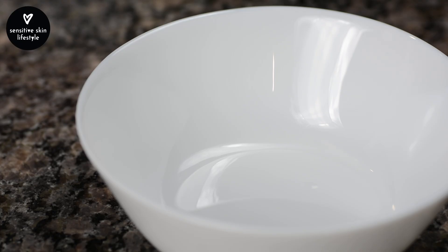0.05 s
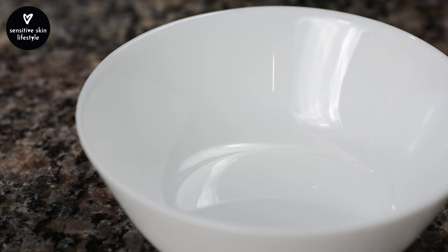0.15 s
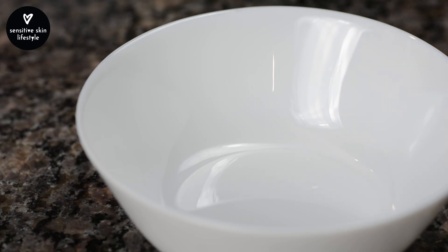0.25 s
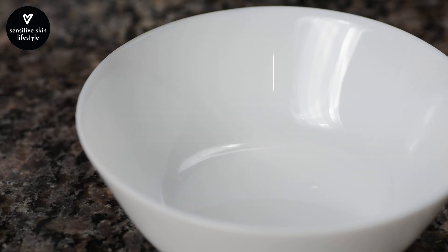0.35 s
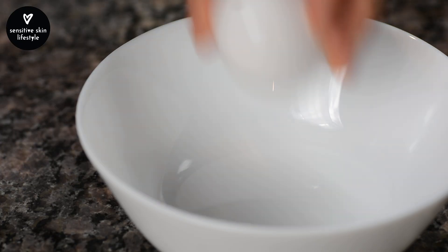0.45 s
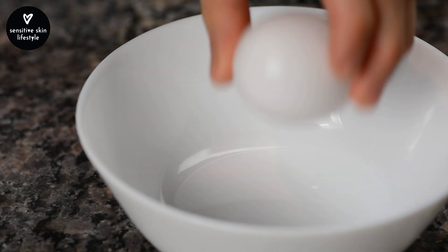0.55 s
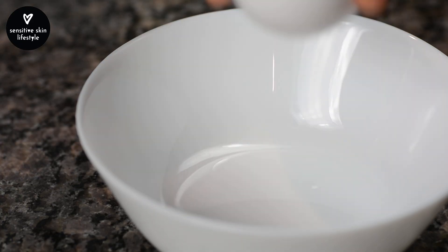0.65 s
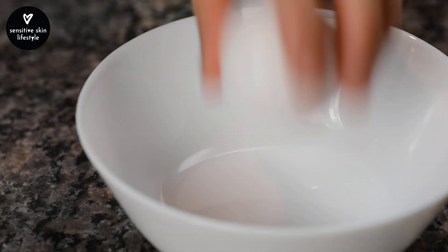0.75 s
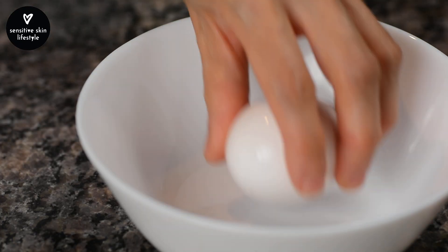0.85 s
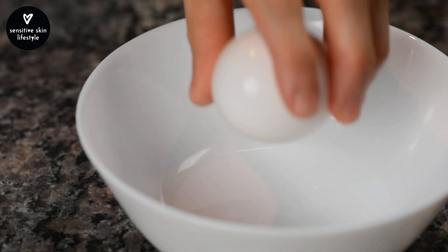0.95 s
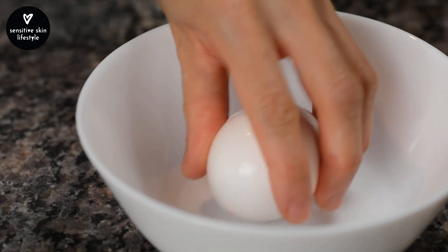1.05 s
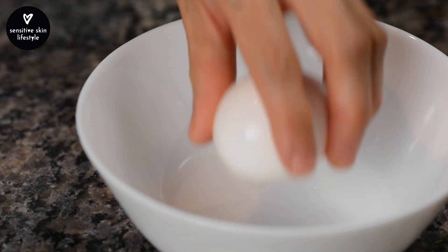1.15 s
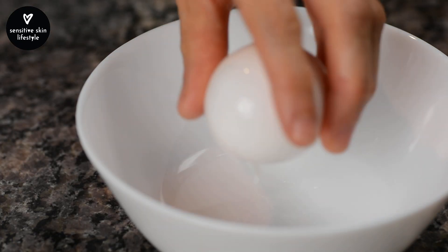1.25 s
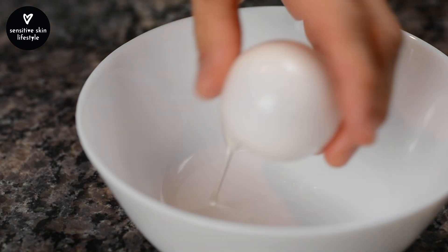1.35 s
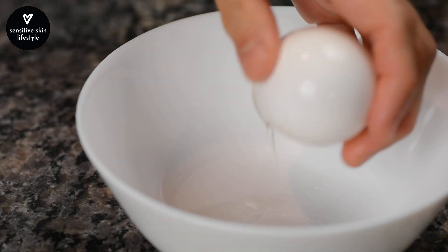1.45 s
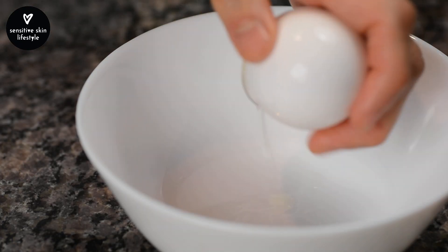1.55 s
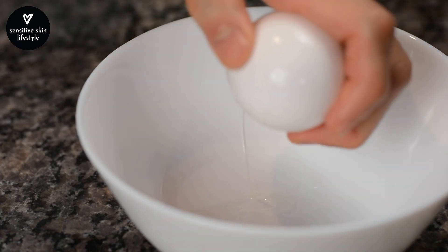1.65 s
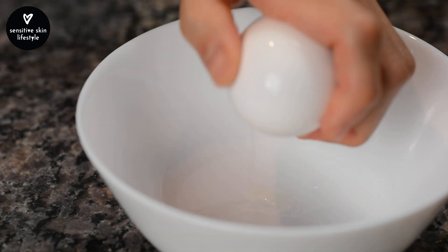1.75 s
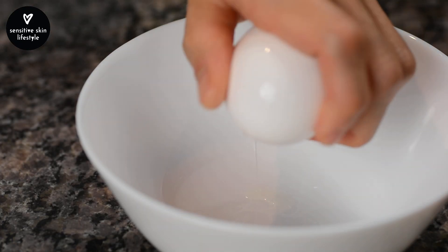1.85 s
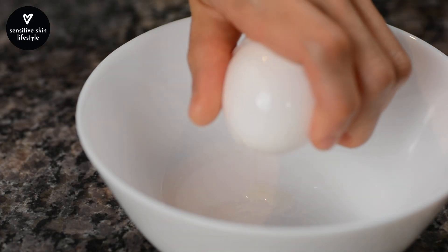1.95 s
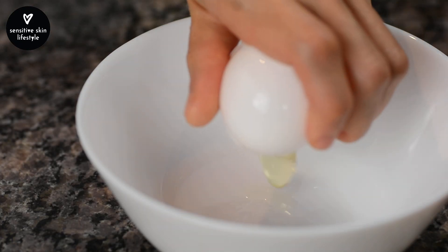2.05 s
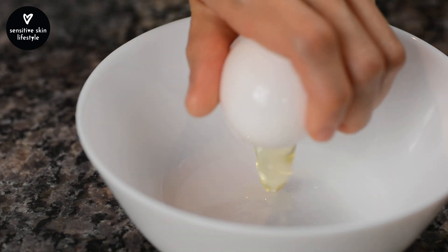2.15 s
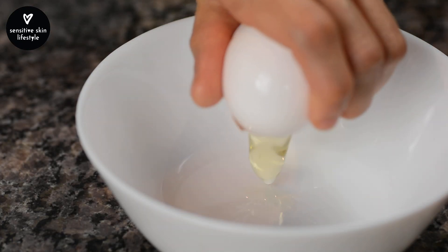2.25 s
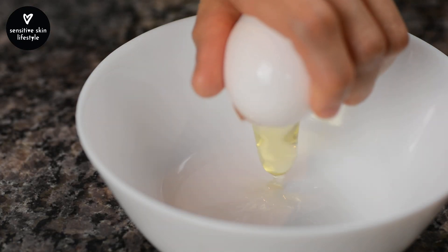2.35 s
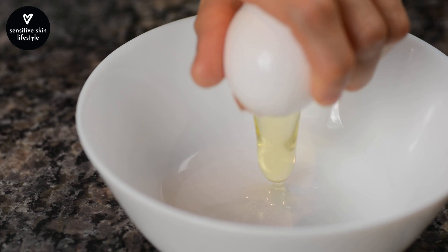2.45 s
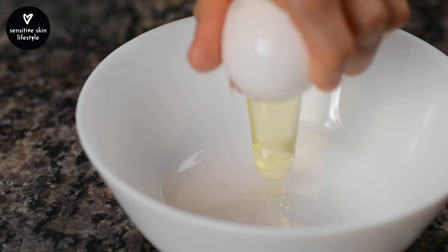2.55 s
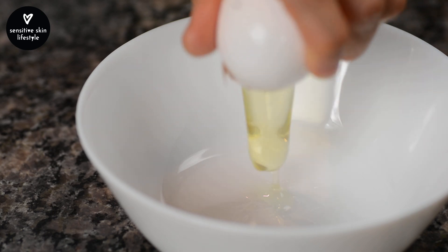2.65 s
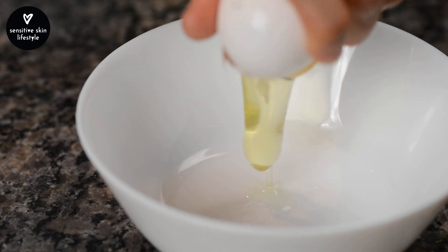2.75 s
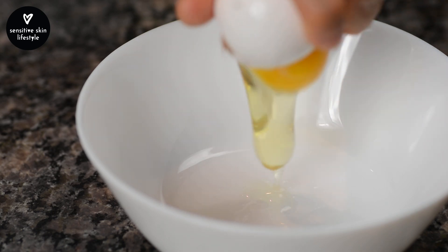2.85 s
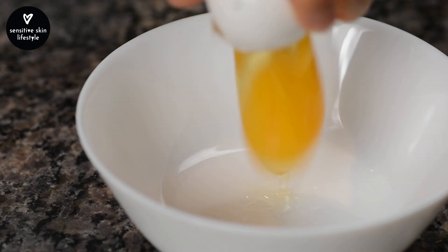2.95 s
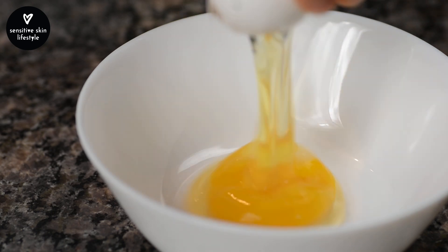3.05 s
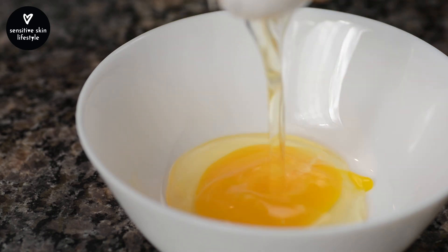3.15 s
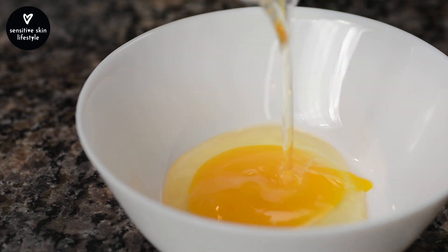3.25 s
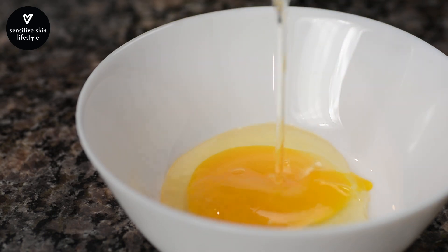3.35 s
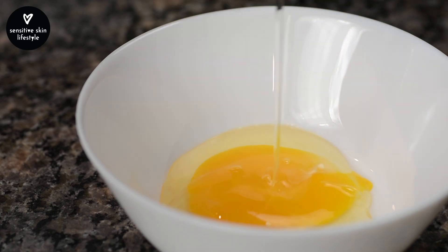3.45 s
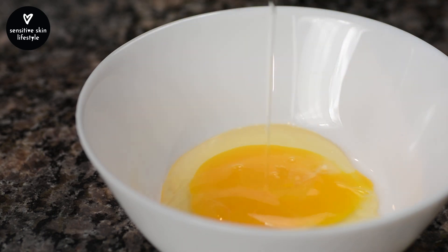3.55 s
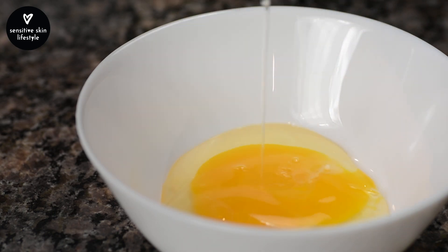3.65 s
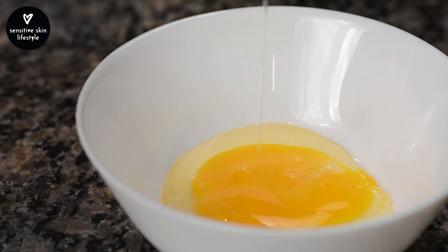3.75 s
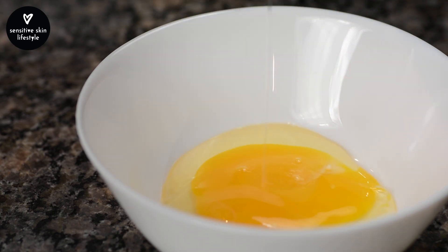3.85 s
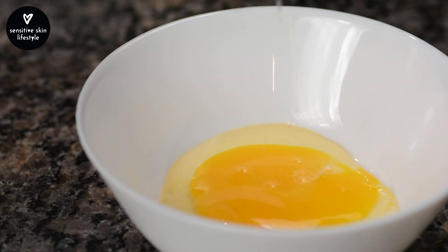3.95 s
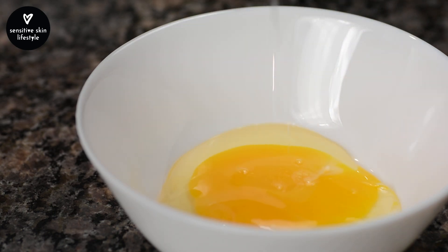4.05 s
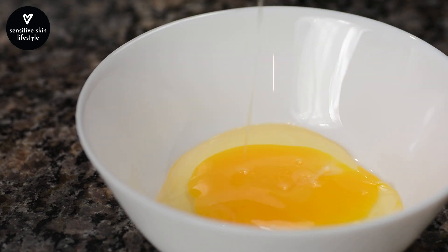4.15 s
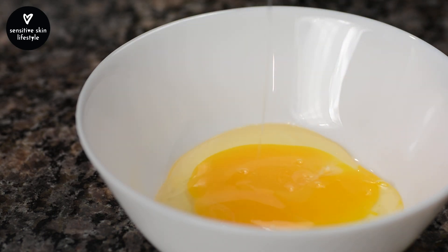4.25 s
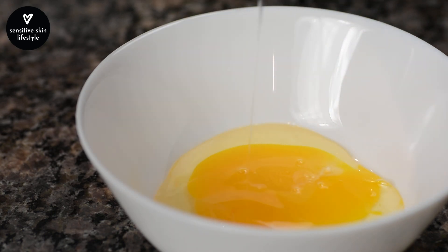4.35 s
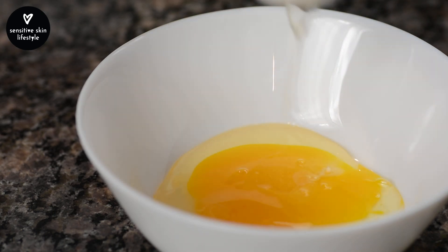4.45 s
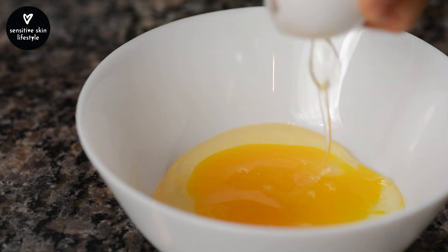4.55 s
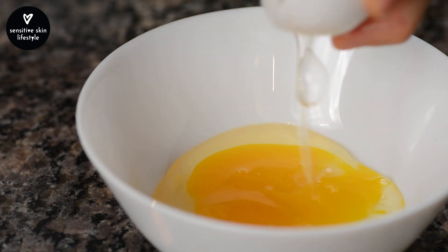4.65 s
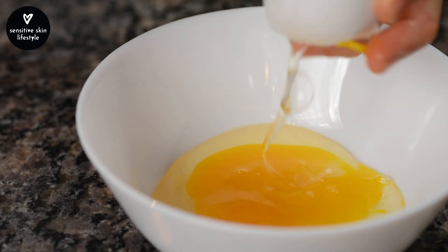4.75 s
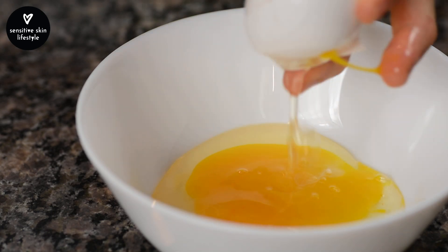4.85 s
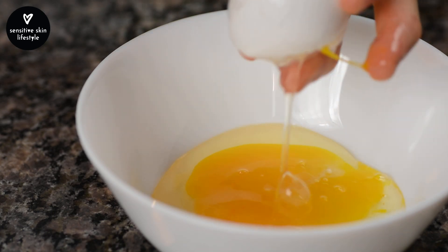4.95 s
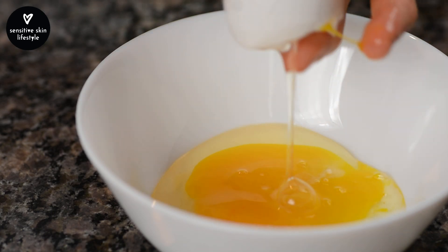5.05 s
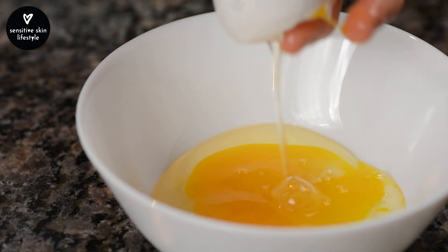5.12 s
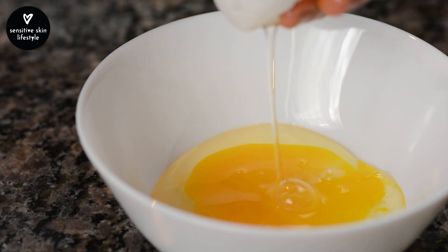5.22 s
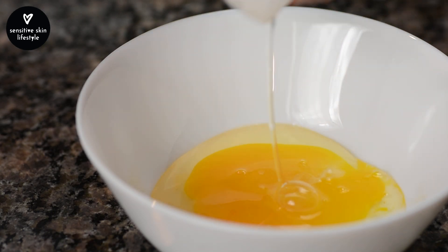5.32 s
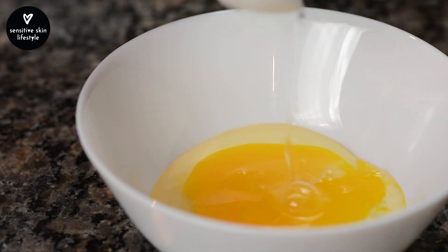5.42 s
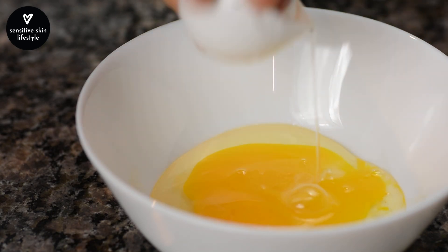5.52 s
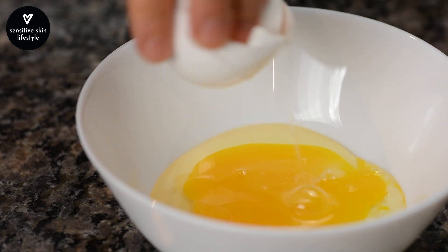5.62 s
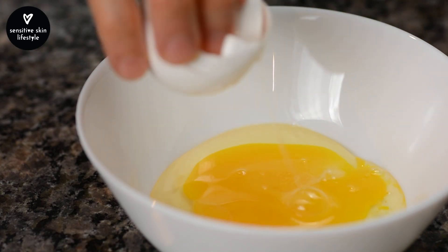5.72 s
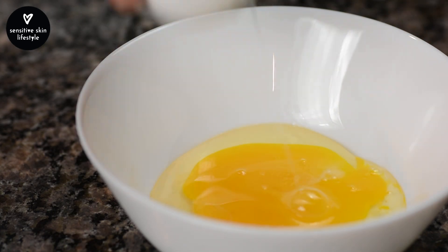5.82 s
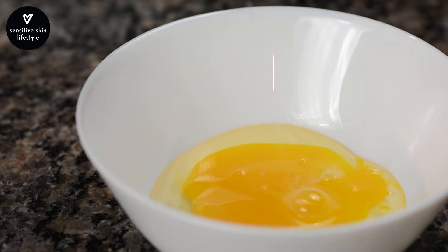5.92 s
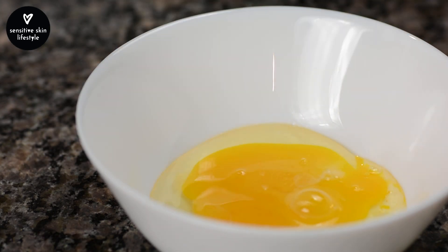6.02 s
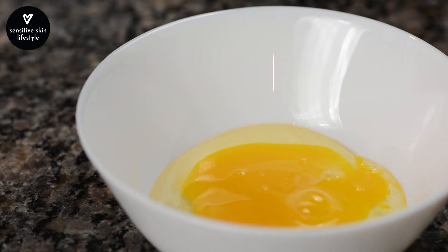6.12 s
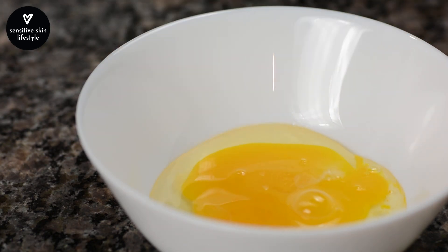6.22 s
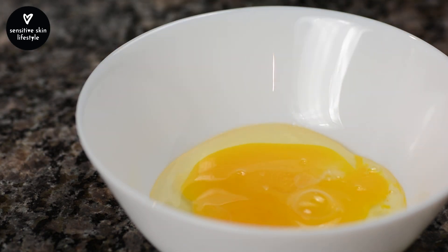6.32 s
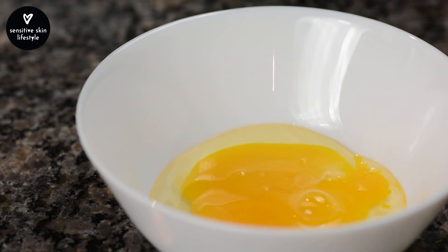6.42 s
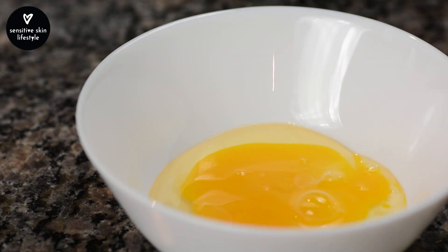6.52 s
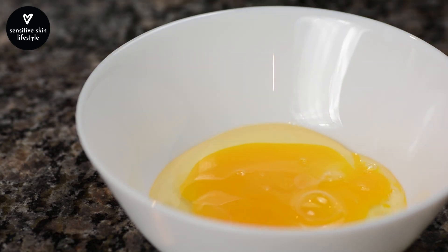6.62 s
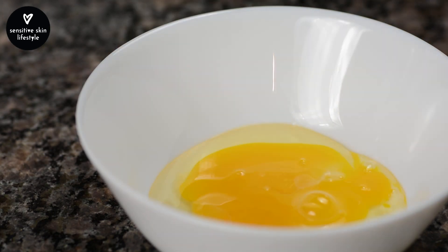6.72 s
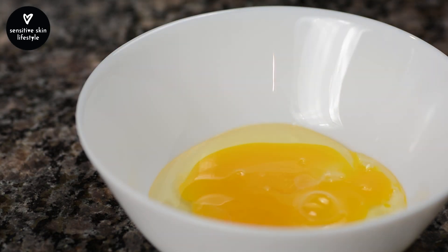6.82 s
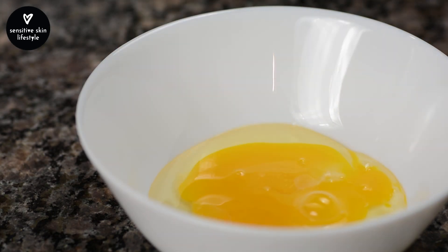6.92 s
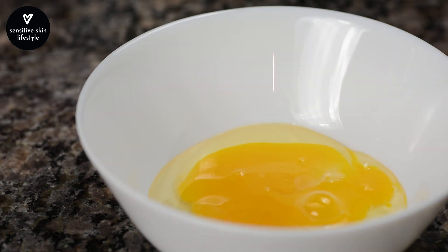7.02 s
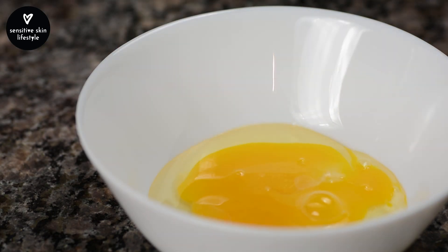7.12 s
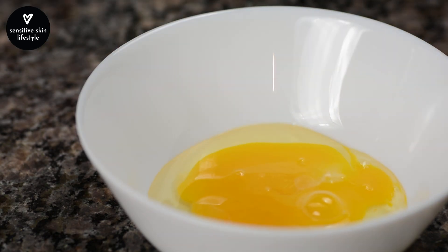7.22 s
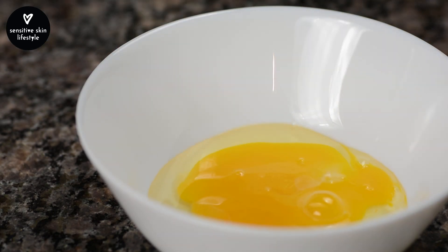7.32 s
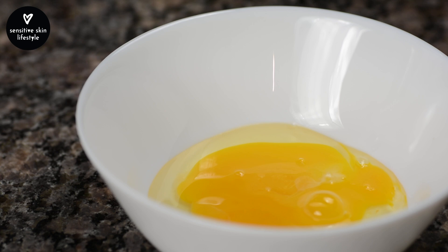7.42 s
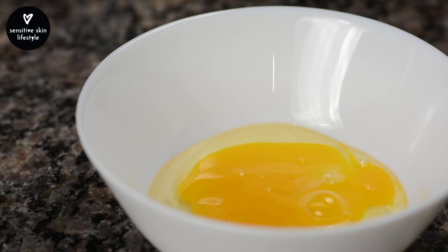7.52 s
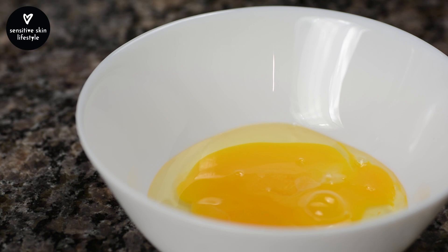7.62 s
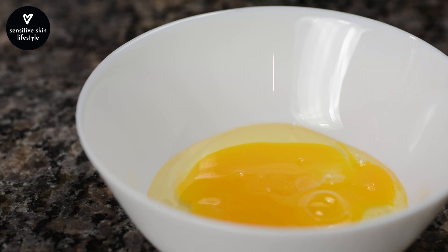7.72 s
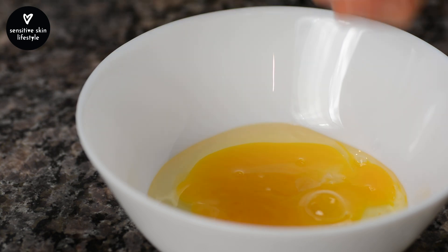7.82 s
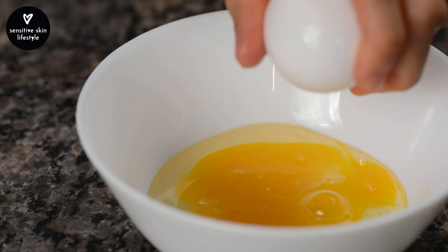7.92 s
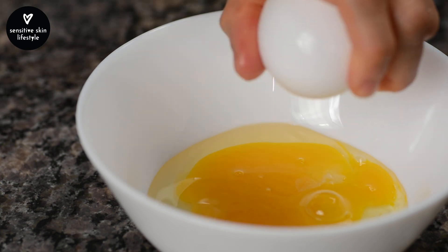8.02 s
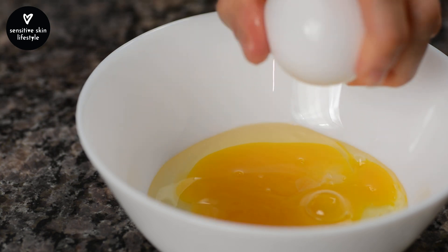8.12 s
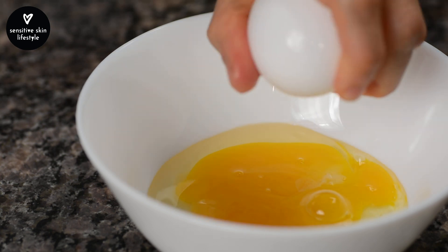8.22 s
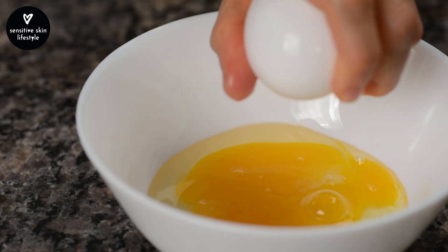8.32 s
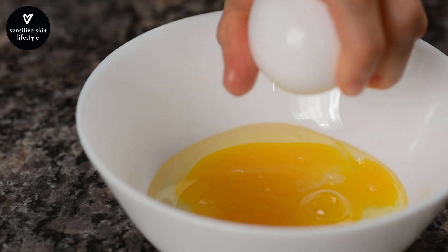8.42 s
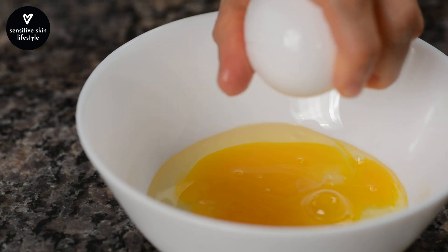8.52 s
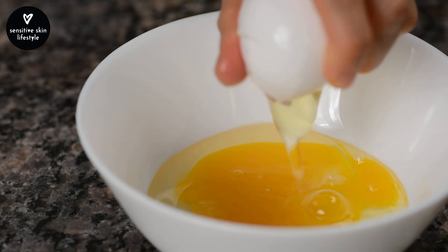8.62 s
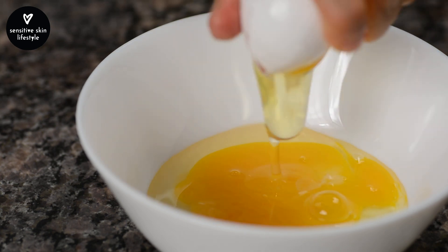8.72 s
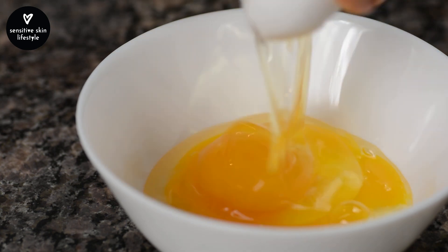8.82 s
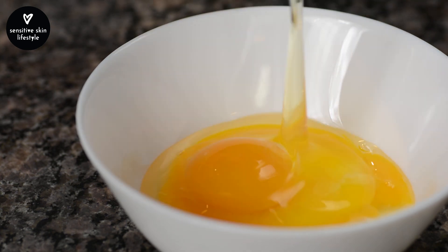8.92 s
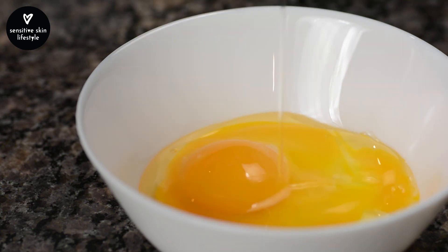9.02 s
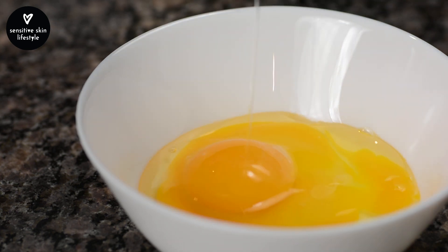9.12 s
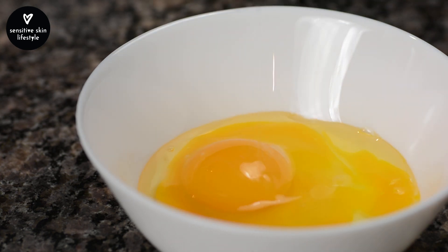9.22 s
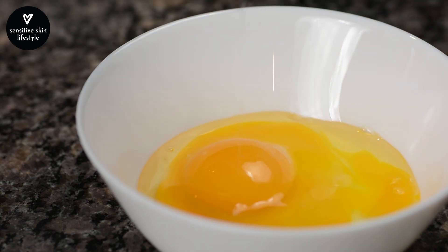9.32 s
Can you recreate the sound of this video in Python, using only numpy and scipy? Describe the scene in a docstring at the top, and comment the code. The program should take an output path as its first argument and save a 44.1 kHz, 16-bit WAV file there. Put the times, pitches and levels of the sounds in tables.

```python
"""An appliance murmurs throughout. First an egg is knocked twice on the rim of a ceramic bowl, close by.
Its shell snaps and crumbles, then the wet halves squelch. A second egg gets three knocks and is pulled open.
Clicks and splinters are random impulses shaped by filters; the bowl is a set of fading cosines.
A hard little kitchen answers each click with filtered random echoes; air and drone are filtered noise.
"""
import sys
import numpy as np
from scipy import signal
from scipy.fft import rfft, irfft
from scipy.io import wavfile
from scipy.ndimage import uniform_filter1d

SR = 44100
rng = np.random.default_rng(int(sys.argv[2]) if len(sys.argv) > 2 else 0)


def wav_out(sig):
    """Save sig, one row per channel (or a flat mono array), as 16-bit PCM at SR to the path in sys.argv[1]."""
    wavfile.write(sys.argv[1], SR, np.round(np.clip(np.atleast_2d(sig).T, -1, 1) * 32767).astype(np.int16))


N = 413216

# Egg on the rim, with relative levels: start_s, counter thump_db, dull body_db, shell clack_db, clack_hz,
# crack_db, low_ring_db, high_ring_db (the two rings belong to the bowl)
EGG_KNOCKS = [(0.8359, 7.5, 9, 24, 1400, 7, -12.5, -3), (1.056, -24, 5, 16.5, 3270, 9, -13.5, -13),
              (6.5677, -33, 18, 28, 1860, -0.5, -15.5, -45), (6.7997, -28, 11.5, 25, 2620, 12, -14, -40),
              (7.025, -16, 3.5, 12, 1660, -2.5, -48, -43)]
# Ringing tones of the bowl: pitch_hz, level_db (relative), t60_s (time to fall by 60 dB)
LOW_BOWL_TONES = [(650, -14, 0.049), (825, -19, .04), (1028, -15, 0.036), (1218, 3.5, 0.027),
                  (1386, -5, 0.058), (1595, -4, 0.045)]
HIGH_BOWL_TONES = [(3890, -7.5, 0.025), (4022, -1, 0.024), (4060, 0.5, 0.029), (4254, -6, 0.0199),
                   (5300, -10, 0.007), (5760, -5.5, 0.0087), (7160, -18.5, 0.02), (14000, -20, 0.015)]
# The clearest breaks of the shell: start_s, level_db (relative), piece_hz (its resonance),
# treble_db (relative to the resonance)
SHELL_SNAPS = [(1.9111, -14, 8000, 0.5), (1.975, 1, 1120, -4), (1.9889, -6, 8100, 10),
               (1.992, -8.5, 1710, 7.5), (2.2125, -8, 1900, -1), (2.415, -5, 2700, 2.5),
               (2.4414, 11, 3050, -8), (2.4996, 2, 2950, 3.5), (2.5524, -13.5, 7800, 17),
               (2.5638, 4, 1900, -1.5), (2.6322, 4, 2000, 0.5), (2.6552, -0.5, 2880, -6),
               (2.7482, -12, 2800, 6.5), (2.9205, -7, 6840, -14), (6.3134, -8.5, 2216, -9.5),
               (7.463, -16.5, 1700, 1), (7.7003, -5.5, 4060, 1), (7.7176, -3.5, 3970, -8.5),
               (7.8768, -4, 2310, -1.5), (7.9834, -7.5, 2000, 0.5), (8.1119, -6, 2000, -4.5),
               (8.1255, -12.5, 2300, 2.5), (8.1822, -7.5, 6570, -4), (8.202, -3, 1940, 3),
               (8.2158, -6.5, 8000, 12), (8.23, -3.5, 2400, 6.5), (8.2371, 0, 1960, -17),
               (8.2763, 0, 2130, -3), (8.389, -6, 2140, 6), (8.605, 2.5, 3300, 2), (8.6976, 1.5, 5300, -6),
               (8.7414, -1.5, 2840, -4), (8.7985, -5.5, 8000, 2.5), (8.814, -11, 2400, 5),
               (8.98, -5, 1380, 1.5), (9.1541, -0.5, 2570, -10)]
# Wet shell halves squeezed and shaken: start_s, level_db (relative), pocket_hz (air pocket resonance)
WET_SQUELCHES = [(4.516, -5, 2100), (4.586, 3, 1480), (4.608, -4, 3200), (4.6469, -8.5, 2530),
                 (4.871, 1.5, 1460), (4.872, -21, 4500), (4.946, -0.5, 1300), (4.9674, -2.5, 1650),
                 (4.976, -12, 8200), (5.286, -14.5, 2240), (5.3324, -7.5, 4300), (5.3515, -5, 1660),
                 (5.5202, -10, 1620), (8.7834, -11, 6500)]
# Fingers work the shell and flakes tear loose: start_s, end_s, level_db (of the smallest flakes, relative),
# wetness (0 to 1)
SHELL_CRUMBLES = [(1.891, 2.114, -34.5, 0.17), (2.184, 2.302, -37, 0), (2.603, 2.755, -30.5, 0),
                  (4.14, 4.314, -42, .55), (4.483, 4.692, -28.5, 0.52), (4.637, 4.796, -29.5, 0.86),
                  (5.352, 5.432, -28, 0.56), (7.703, 7.786, -31.5, 0.1), (7.872, 8.1, -42, 0.1),
                  (8.195, 8.293, -20, 0), (8.612, 8.864, -28.5, 0.23), (8.817, 9.012, -35, 0.13)]
# Early echoes off the bowl and the counter, before their spectrum is evened out: delay_s, level_db
EARLY_ECHOES = [(.0007, -3.5), (.0019, -7), (.0042, -14.5), (.0058, -8.5), (.007, -19), (0.0143, -21.5),
                (0.0183, -12)]
# How long the kitchen rings: pitch_hz, t60_s
KITCHEN_T60 = [(200, .5), (600, 0.52), (1400, 0.58), (4000, 0.61), (9000, 0.44), (15000, 0.46)]
# How strongly the kitchen rings, before its soft build-up: pitch_hz, level_db
KITCHEN_LEVEL = [(50, -24.5), (100, 1.5), (400, -5.5), (800, 4.5), (1500, -4), (4000, -5), (9000, -5),
                 (15000, -10)]
# Left-right difference of the egg's reflections, as a filter: pitch_hz, level_db
KITCHEN_WIDTH = [(60, -4.5), (200, -24.5), (1200, -29.5), (2400, -22.5), (4400, -11), (8000, -6.5),
                 (15000, -1.5)]
# Tone colour of the room air: pitch_hz, level_db (per Hz, relative)
AIR_COLOUR = [(25, -62), (55, -24), (80, -7.5), (105, -11), (135, -3.5), (175, -5.5), (300, -3), (410, 0.5),
              (500, -4.5), (700, -2), (1200, -5.5), (2000, -13.5), (6000, -25.5), (16000, -35.5)]
# Left-right difference of the air: pitch_hz, level_db (relative to the middle)
AIR_WIDTH = [(60, -34.5), (380, -22), (1290, -20.5), (2400, -11), (4400, -5.5), (15000, 1)]
# Tones of the appliance: pitch_hz, level_db (rms)
APPLIANCE_TONES = [(106, -66), (178, -66.5), (231, -64.5), (291, -64.5), (396, -60.5), (5749, -86)]

AIR_DB = -50.5  # rms level of the air in the middle
TOP_HZ = 16000  # upper limit of the final sound
# Smaller pieces carry less bass: lows relative to the resonance for a 1 kHz piece, and the change per octave
PIECE_LOW_DB, PIECE_LOW_DB_PER_OCTAVE = 8, -10.5
# Smaller pockets are brighter: treble relative to the resonance at 1 kHz, change per octave; then their lows
POCKET_TREBLE_DB, POCKET_TREBLE_DB_PER_OCTAVE, POCKET_LOW_DB = -18, 8.5, -15.5
# Flakes of dry and of soaked shell: resonance, and treble relative to it
DRY_FLAKE_HZ, DRY_FLAKE_TREBLE_DB = 3600, 1.5
WET_FLAKE_HZ, WET_FLAKE_TREBLE_DB = 1260, -18


def scene():
    """The eggs sit in the middle; their reflections and the air also differ between left and right."""
    eggs = knocks() + snaps() + squelches() + crumbles()
    air_mid, air_side = air()
    near = signal.oaconvolve(eggs, near_path())[:N]
    mid = near + room(eggs) + air_mid

    sideways = tail()
    add(sideways, 0, amp(-4.5) * burst(splinter_share=1.0, fade_s=0.008, per_s=4000))
    side = colour(signal.oaconvolve(eggs, sideways)[:N], KITCHEN_WIDTH) + air_side
    balance = amp([[-0.2], [0.2]])  # the right is slightly louder
    return np.array([mid + side, mid - side]) * balance


def knocks():
    """The egg thuds on the rim, its shell caves in as a run of splinters, and the bowl rings briefly."""
    out = np.zeros(N)
    for start, thump_db, body_db, clack_db, clack_hz, crack_db, low_db, high_db in EGG_KNOCKS:
        thud = [(20, thump_db - 3.5), (70, thump_db), (150, body_db - 10), (280, body_db - 7), (390, body_db)]
        clack = [(clack_hz / 2, (body_db + clack_db) / 2 - 2), (clack_hz, clack_db),
                 (clack_hz * 2, (clack_db + crack_db) / 2 - 4)]
        crack = [(7000, crack_db - 1), (15000, crack_db)]
        splinters = whiten(burst(splinter_share=1.0, fade_s=0.0057, per_s=5500), smooth_hz=120)
        add(out, start, colour(splinters, sorted(thud + clack + crack)))
        add(out, start, amp(low_db) * ring(LOW_BOWL_TONES) + amp(high_db) * ring(HIGH_BOWL_TONES))
    return out


def ring(modes, rise_s=0.00085):
    """Fading tones of the struck bowl, swelling as the blow spreads round the rim."""
    t = seconds(0.3)
    tones = sum(amp(db - 60 * t / t60) * np.cos(2 * np.pi * hz * t) for hz, db, t60 in modes)
    return tones * (1 - np.exp(-t / rise_s))


def snaps():
    """Dry, sharp breaks; the broken piece of shell pings very briefly."""
    out = np.zeros(N)
    for start, db, hz, treble_db in SHELL_SNAPS:
        low_db = PIECE_LOW_DB + PIECE_LOW_DB_PER_OCTAVE * octaves(hz)
        crack = whiten(burst(splinter_share=0.32, fade_s=0.0046, per_s=4200), smooth_hz=850)
        crack = resonate(crack, hz, t60=0.006, gain=0.6)
        add(out, start, amp(-3.5) * shell(crack, db, hz, low_db, treble_db))
    return out


def squelches():
    """Many small sticky ticks ring the first two modes of an air pocket in the wet shell."""
    out = np.zeros(N)
    for start, db, hz in WET_SQUELCHES:
        treble_db = POCKET_TREBLE_DB + POCKET_TREBLE_DB_PER_OCTAVE * octaves(hz)
        ticks = whiten(burst(splinter_share=0.96, fade_s=0.0084, per_s=2200), smooth_hz=596)
        ticks = resonate(ticks, hz, t60=0.02, gain=0.8)
        ticks = resonate(ticks, 1.9 * hz, t60=0.012, gain=0.7)
        add(out, start, amp(-1.5) * shell(ticks, db, hz, POCKET_LOW_DB, treble_db))
    return out


def crumbles(per_s=260, spread_db=6.0, low_db=-12):
    """Tiny flakes of uneven size tear from the membrane; wetter shell sounds lower and duller."""
    happens = rng.random(N) < per_s / SR
    direction = rng.choice([-1, 1], N)
    size = amp(spread_db * np.minimum(rng.exponential(1, N), 3))
    flakes = happens * direction * size
    out = np.zeros(N)
    for start, end, db, wetness in SHELL_CRUMBLES:
        hz = DRY_FLAKE_HZ * (WET_FLAKE_HZ / DRY_FLAKE_HZ) ** wetness
        treble_db = DRY_FLAKE_TREBLE_DB + (WET_FLAKE_TREBLE_DB - DRY_FLAKE_TREBLE_DB) * wetness
        length = max(int((end - start) * SR), 2)
        run = flakes[int(start * SR):][:length]
        fade_in_out = signal.windows.tukey(len(run), 0.5)
        add(out, start, shell(run, db, hz, low_db, treble_db) * fade_in_out)
    return out


def shell(drive, db, hz, low_db, treble_db):
    """A piece of shell colours clicks around its own resonance; it is too small to radiate bass."""
    below = [(50, low_db - 40), (200, low_db - 17.5), (max(700, hz / 3), low_db), (hz / 1.55, 0.18 * low_db)]
    above = [(hz * 1.86, 0.5 * treble_db), (max(6500, hz * 1.18), treble_db), (16000, treble_db - 6)]
    return amp(db) * colour(drive, sorted(below + [(hz, 1.5)] + above))


def burst(splinter_share, fade_s, per_s, size=4096):
    """One fracture and the run of tiny splinters that follows it, with a total energy of 1."""
    t = np.arange(size) / SR
    happens = rng.random(size) < per_s / SR
    splinters = rng.standard_normal(size) * happens * np.exp(-t / fade_s)
    fracture = t == 0  # a single click
    return unit(np.sqrt(1 - splinter_share) * fracture + np.sqrt(splinter_share) * unit(splinters))


def resonate(x, hz, t60, gain):
    """Adds one short ringing mode to a run of clicks."""
    t, fade = seconds(2 * t60), np.log(1000) / t60
    mode = 2 * fade / SR * np.exp(-fade * t) * np.cos(2 * np.pi * hz * t)
    return x + gain * signal.fftconvolve(x, mode)[:len(x)]


def near_path(size=8192):
    """The direct sound and its slightly scattered echoes from bowl and counter."""
    path = np.zeros(size)
    path[0] = 1
    for delay, db in EARLY_ECHOES:
        add(path, delay, amp(db) * burst(splinter_share=0.61, fade_s=0.0036, per_s=20000))
    return disperse(whiten(path, smooth_hz=250))


def disperse(x):
    """Bending waves run faster in the treble, so each click leaves the shell as a tiny chirp."""
    # the delay grows towards the bass; it is counted from the very top pitch, which has none
    delay_s, at_hz = 0.0013, 1000
    hz = np.fft.rfftfreq(len(x), 1 / SR)
    lag = 2 * np.sqrt(hz * at_hz) - hz * np.sqrt(at_hz / hz[-1])
    fade_out = np.cos(np.linspace(0, np.pi / 2, len(x))) ** 2
    return fade_out * irfft(rfft(x) * np.exp(-2j * np.pi * delay_s * lag), len(x))


def room(x, count=3):
    """The hands move over the bowl, so the reflections blend in turn between a few random patterns."""
    turn = np.arange(N) / SR / 0.55  # a new pattern every 0.55 s
    pattern = np.arange(count)[:, None]
    distance = abs((turn - pattern + count / 2) % count - count / 2)
    out = np.zeros(N)
    for d in distance:
        share = np.cos(np.pi / 2 * np.minimum(d, 1))
        out += signal.oaconvolve(x * share, tail())[:N]
    return out


def tail(size=32768, order=8):
    """Random reflections of the kitchen, each pitch band dying at its own speed."""
    happens = rng.random(size) < 1 / order
    taps = rng.standard_normal(size) * happens * np.sqrt(order)
    hz, t, bands = signal.stft(taps, SR, nperseg=256)
    t60 = read(KITCHEN_T60, hz)[:, None]
    level_db = read(KITCHEN_LEVEL, hz)[:, None]
    # the square root keeps long and short tails equally strong
    bands = bands * amp(level_db - 60 * t / t60) * np.sqrt(2 * np.log(1000) / (t60 * SR))
    build_up = 1 - np.exp(-(np.arange(size) / SR / 0.012) ** 2)
    return signal.istft(bands, SR, nperseg=256)[1][:size] * build_up


def air():
    """Soft room noise plus an appliance's unsteady tones, cut from noise as narrow bands: mid and side."""
    hz = np.fft.rfftfreq(N, 1 / SR)
    mid, side, hum = rfft(rng.standard_normal((3, N)))
    shape = amp(read(AIR_COLOUR, hz))
    shape = amp(AIR_DB) * shape / np.sqrt(np.mean(shape ** 2))
    drone = np.zeros(N)
    for tone_hz, db in APPLIANCE_TONES:
        width_hz = 3 + 0.014 * tone_hz
        tone = irfft(hum / (1 + ((hz - tone_hz) / width_hz) ** 2), N)
        drone += amp(db) * np.sqrt(N) * unit(tone)
    return irfft(mid * shape, N) + drone, irfft(side * shape * amp(read(AIR_WIDTH, hz)), N)


def whiten(x, smooth_hz):
    """Evens out the spectrum of a run of clicks so that it has no pitch; energy 1."""
    power = abs(np.fft.fft(unit(x))) ** 2
    width = int(smooth_hz * len(x) / SR) | 1  # an odd number of bins
    power = uniform_filter1d(power, width, mode="wrap")
    return unit(causal(x, 1 / np.sqrt(power + 0.017)))


def colour(x, points, size=4096):
    """Filters a sound to the given (Hz, dB) shape without any echo ahead of it."""
    hz = abs(np.fft.fftfreq(size, 1 / SR))
    return causal(x, amp(read(points, hz)))


def causal(x, gain):
    """Minimum-phase filter, which reacts as early as it can; gain covers the full frequency circle."""
    taps = np.fft.ifft(np.exp(np.conj(signal.hilbert(np.log(gain))))).real
    return signal.fftconvolve(x, taps)[:len(x)]


def amp(db):
    """Decibels to gain."""
    return 10 ** (np.asarray(db) / 20)


def unit(x):
    """Scales to an energy of 1."""
    return x / np.sqrt(np.sum(x ** 2) + 1e-20)


def read(points, hz):
    """Joins (Hz, value) points along a logarithmic pitch axis."""
    f, value = np.transpose(points)
    return np.interp(np.log(hz + 1), np.log(f + 1), value)


def octaves(hz):
    """Octaves above 1 kHz."""
    return np.log2(hz / 1000)


def seconds(length):
    """Time axis of the given length in seconds."""
    return np.arange(int(length * SR)) / SR


def add(mix, start, sound):
    """Mixes a sound in at a start time in seconds."""
    part = mix[round(start * SR):][:len(sound)]
    part += sound[:len(part)]


def record(dry):
    """Peaks beyond full scale are clipped; then the highest treble is cut off."""
    clipped = np.clip(dry, -1, 1)
    low_pass = signal.firwin(511, TOP_HZ, window=("kaiser", 9), fs=SR)
    return signal.oaconvolve(clipped, low_pass[None], "same")


dry = scene()
out = record(dry)
wav_out(out)
```